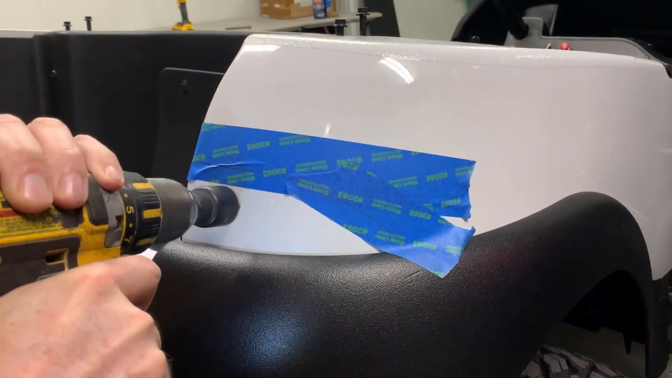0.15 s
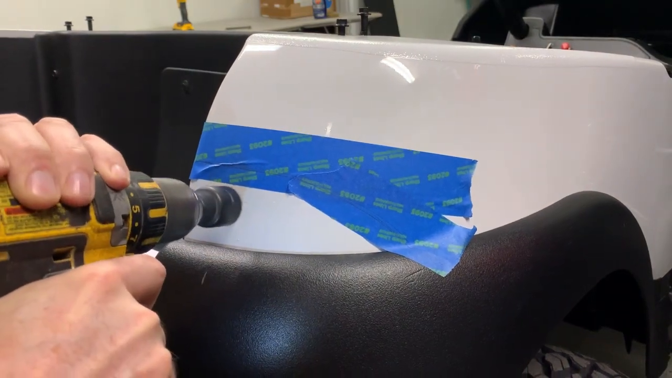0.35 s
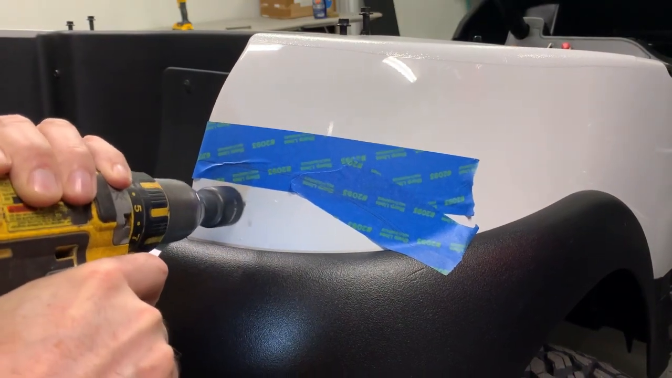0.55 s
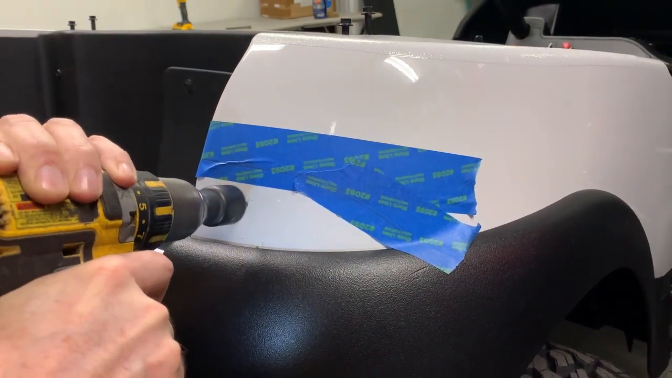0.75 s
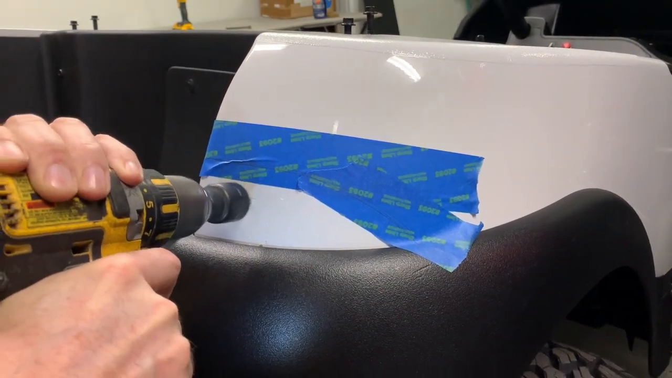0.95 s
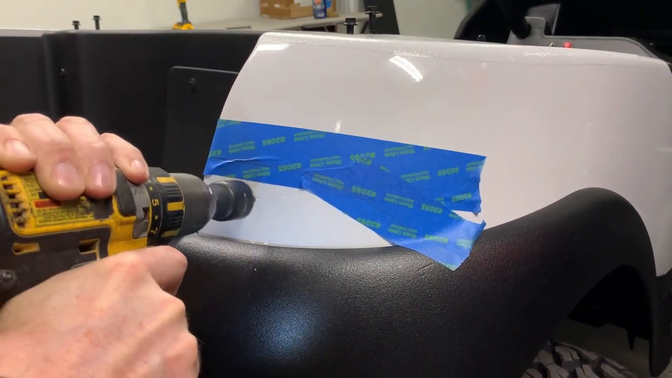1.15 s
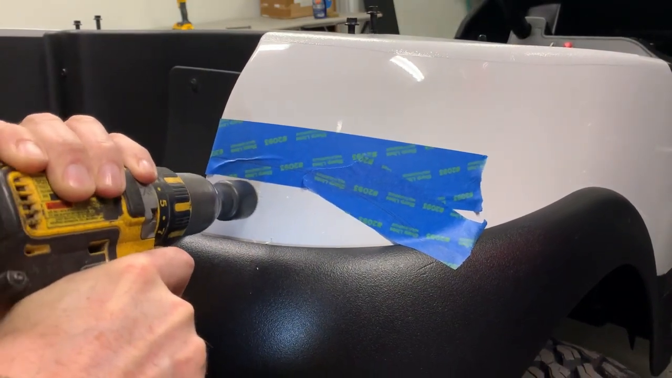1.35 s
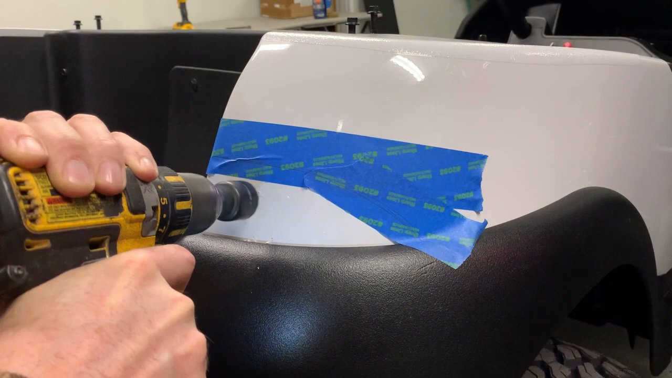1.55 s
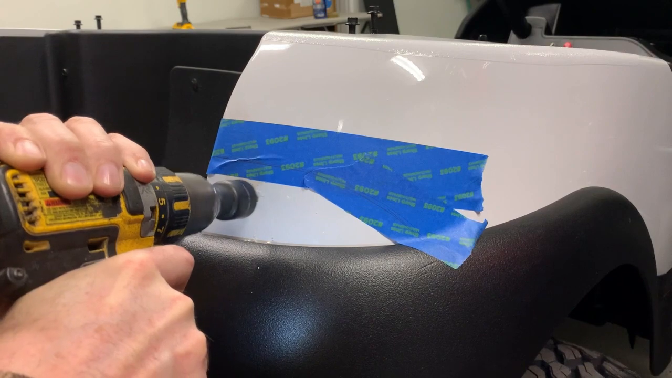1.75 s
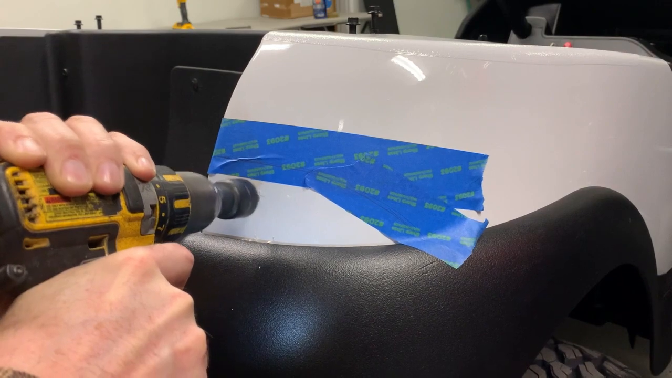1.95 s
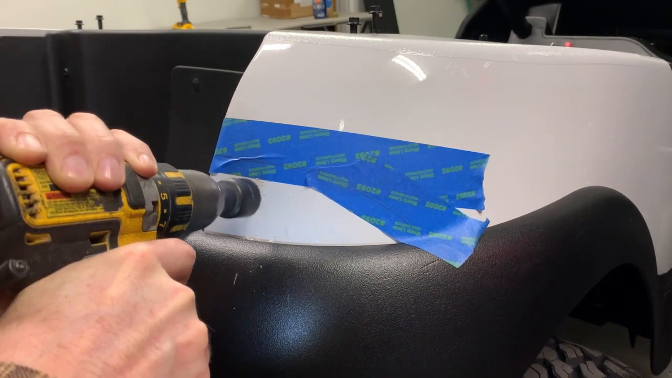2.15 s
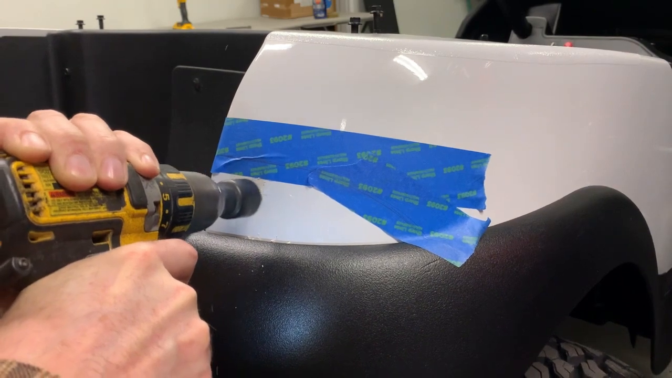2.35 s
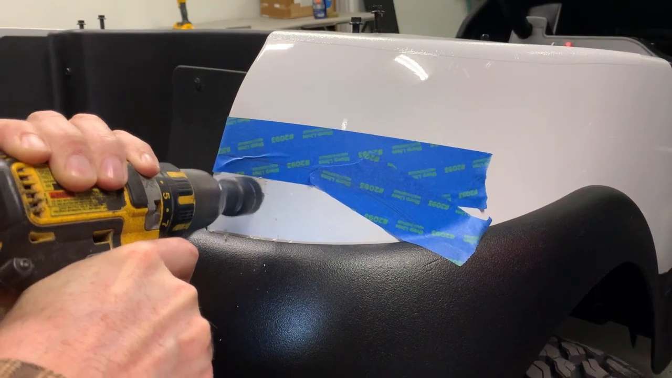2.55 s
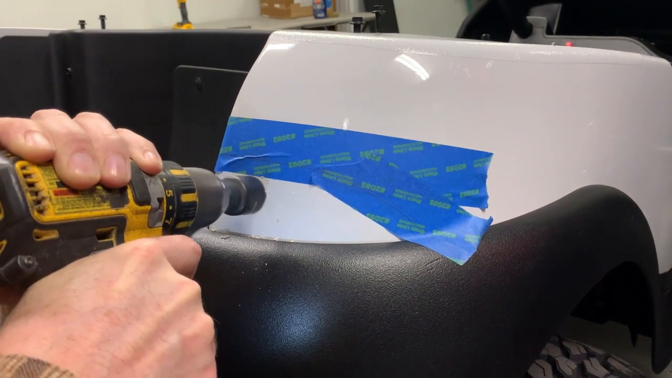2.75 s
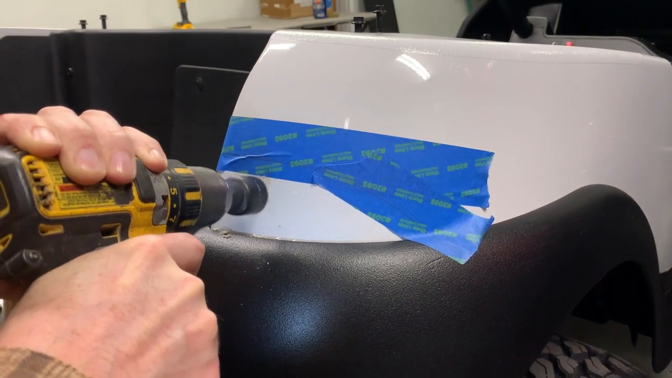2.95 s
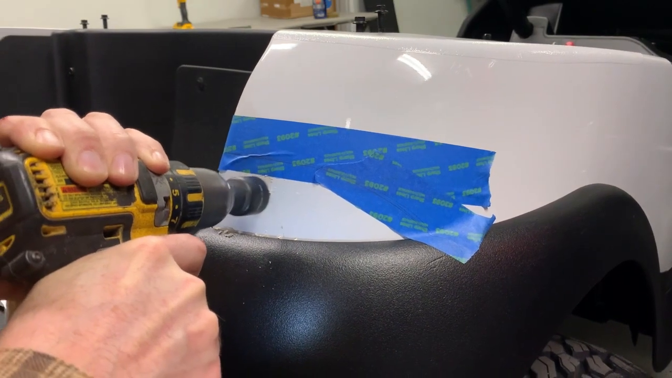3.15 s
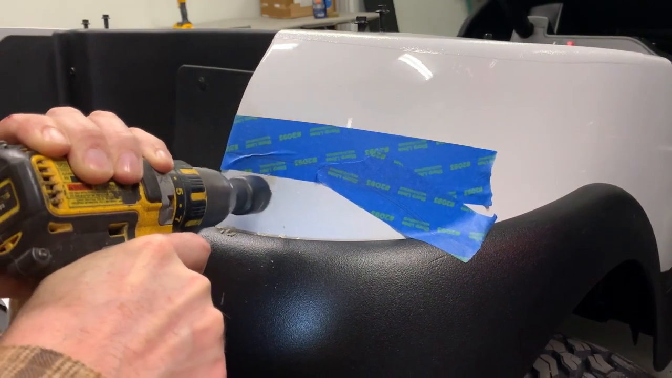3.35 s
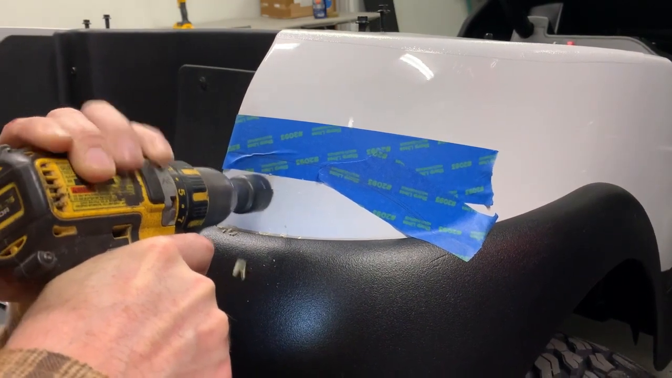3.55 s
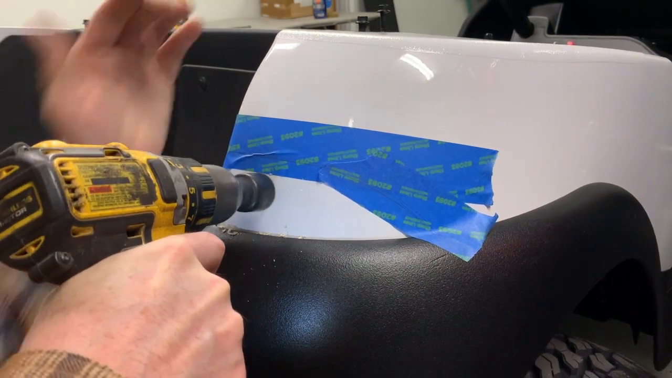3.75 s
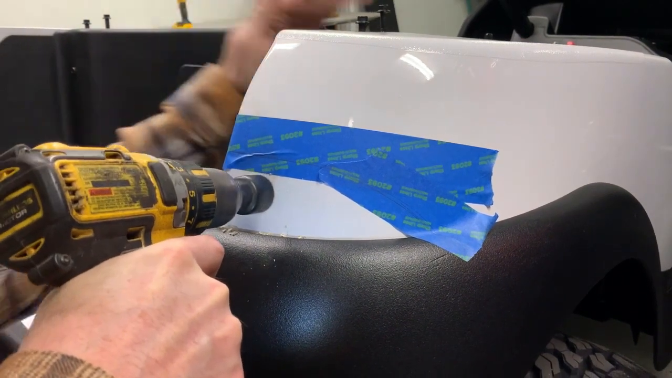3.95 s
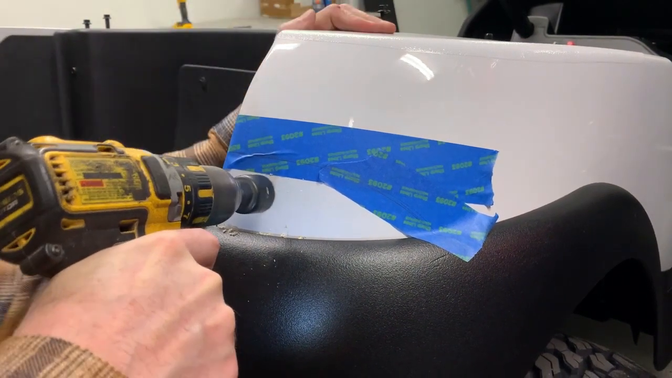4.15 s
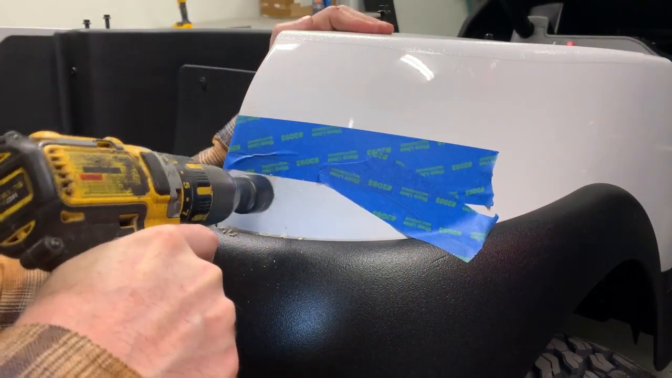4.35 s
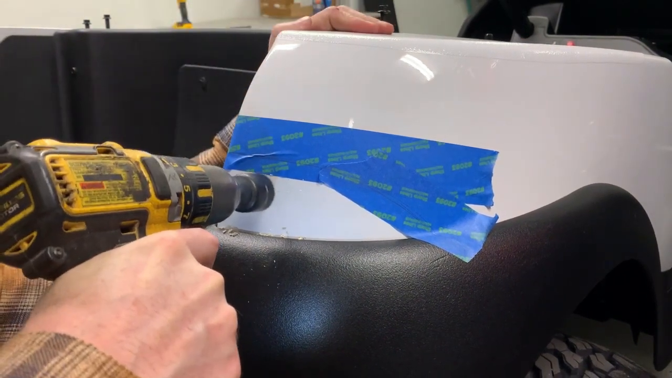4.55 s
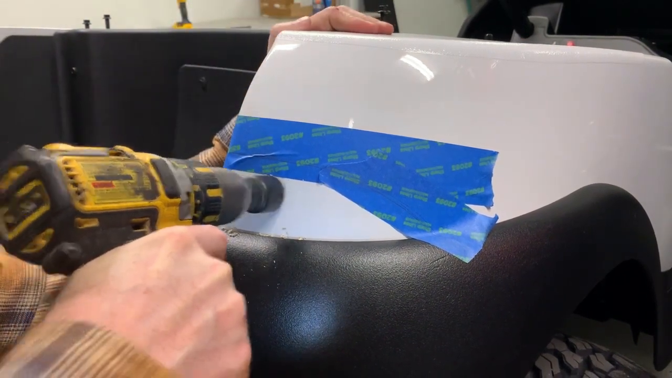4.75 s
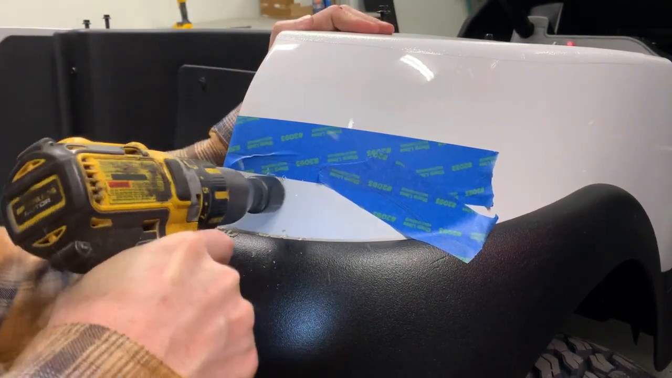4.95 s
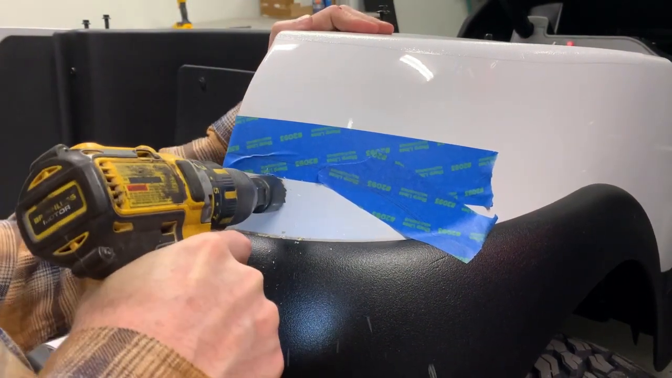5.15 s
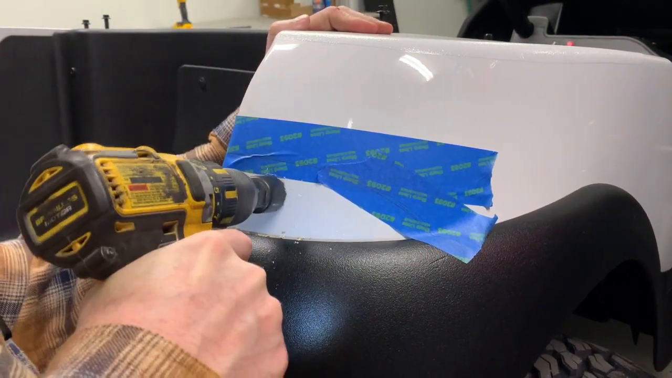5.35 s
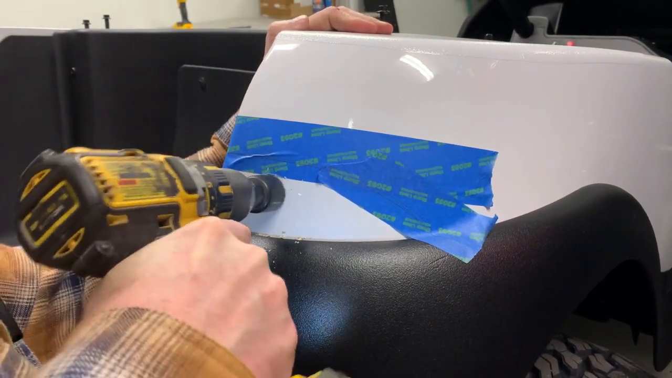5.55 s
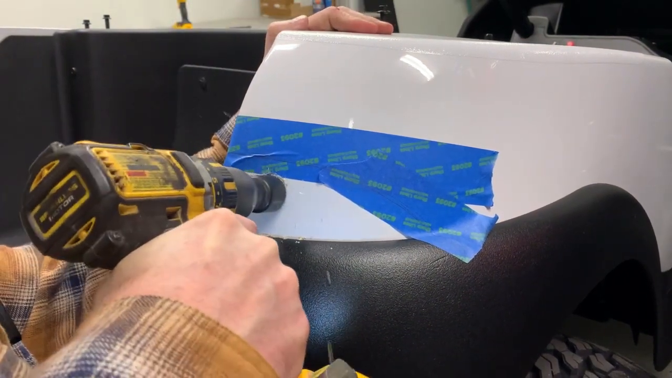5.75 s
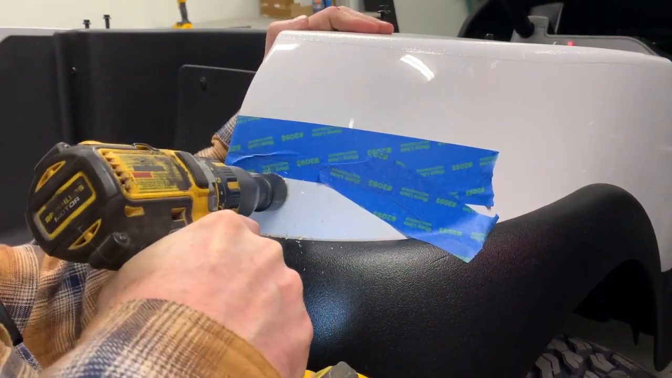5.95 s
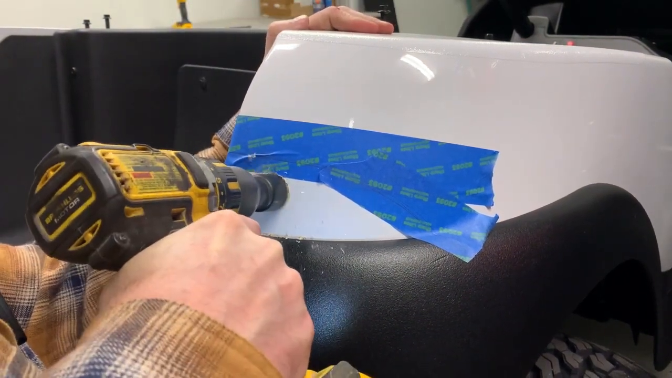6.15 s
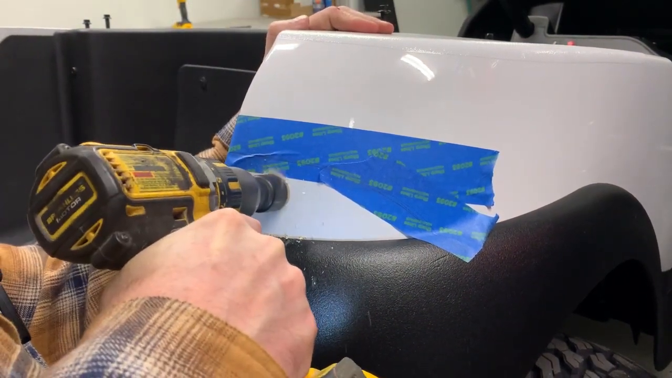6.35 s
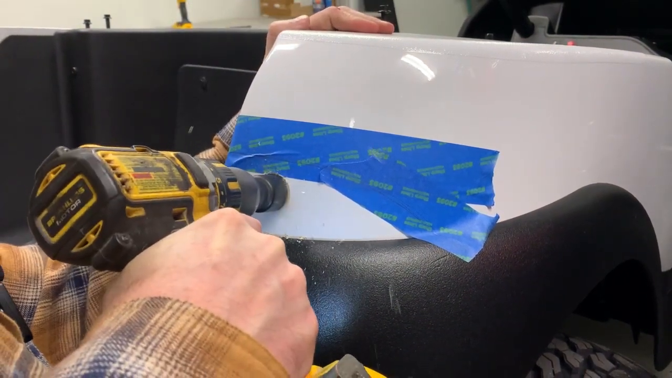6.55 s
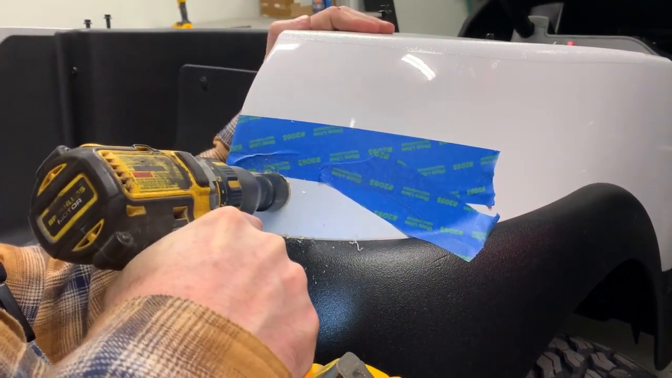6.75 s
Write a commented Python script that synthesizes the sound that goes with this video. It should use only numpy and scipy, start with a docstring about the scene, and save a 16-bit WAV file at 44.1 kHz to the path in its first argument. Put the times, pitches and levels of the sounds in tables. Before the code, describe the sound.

A cordless drill whines and scrapes through plastic, races with a squeal, coasts down, snags, stops, then bites into a loud, droning cut.

```python
"""Cordless drill and hole saw in a plastic panel

A drill close by cuts a plastic body panel in a garage: whining gear orders over rush, whirr and rattle noise.
The pilot bit scrapes through (filtered grains), the drill races, its shank squeals once a turn (swelling
noise in steel resonances) and it coasts down. The saw grazes the panel, snags and is braked; restarted,
its teeth bite, and grains drive the panel's modes into a drone. One motor angle times all the turning parts."""
import sys
import numpy as np
from scipy import signal
from scipy.fft import rfft, next_fast_len
from scipy.io import wavfile
from scipy.ndimage import uniform_filter1d

SR = 44100
rng = np.random.default_rng(int(sys.argv[2]) if len(sys.argv) > 2 else 0)


def to_wav(s):
    """Save 16-bit WAV."""
    ch = np.atleast_2d(s).T  # columns
    pcm = np.round(np.clip(ch, -1, 1) * 32767)  # PCM
    wavfile.write(sys.argv[1], SR, pcm.astype(np.int16))


N = 300321
TIME = np.arange(N) / SR

SAW_RATIO, CARRIER_RATIO = 49.5, 5.32  # motor turns per turn of the saw, of the planet carrier
# one snag drags the motor down and jolts the fender (slowing as a fraction of speed)
SNAG_S, SNAG_GRAB_S, SNAG_FREE_S, SNAG_SLOWING = 4.795, 0.032, 0.085, 0.41
BRAKE_S = 5.064

# level tables: before each source's trim
# pilot bit scraping, breaking through, widening the hole: time_s, level_db
PILOT_LEVEL = [(0.0, -46), (0.12, -38), (0.95, -37), (1.22, -42), (1.45, -56.5), (1.7, -61.5), (1.87, -42),
               (2.25, -49)]
# upper gear orders singing in the housing: time_s, level_db
WHIRR_LEVEL = [(0.08, -40), (0.2, -33), (0.68, -42), (1.1, -38), (1.7, -38.5), (1.88, -41.5), (1.96, -31),
               (2.1, -30), (2.25, -50)]
# wobble of the fast drill in the hole: time_s, level_db
WOBBLE_LEVEL = [(1.76, -68), (1.93, -44.5), (2.19, -41), (2.42, -48.5), (3.0, -49.5), (3.2, -55.5),
                (3.5, -65.5), (3.63, -56), (3.85, -74)]
# teeth cutting, one table a cut (grazing, biting): time_s, panel_drone_db, chip_noise_db
CUT_LEVELS = [
    [(4.27, -75, -76.5), (4.38, -72, -59.5), (4.44, -73, -49), (4.785, -64, -48.5), (4.806, -37, -44),
     (4.88, -39.5, -44.5), (4.95, -41, -50.5), (4.98, -37.5, -47), (5.07, -43, -64)],
    [(5.4, -47, -78), (5.44, -38, -81), (5.49, -38, -73), (5.56, -31.5, -51.5), (5.645, -29, -42),
     (5.68, -30.5, -34.5), (6.42, -28, -34), (6.52, -26.5, -33), (6.81, -31.5, -34)],
]
# chip noise spectrum: freq_hz, level_db
CHIP_SPECTRUM = [(150, -37), (600, 4.5), (1300, 1), (1900, -2), (2400, -28), (2950, -3.5), (3400, 1.5),
                 (4200, 4), (4700, -12), (6000, -0.5), (7000, -3.5), (7800, -14.5), (15000, -27.5)]
# panel resonances: freq_hz, width_hz, level_db
PANEL_MODES = [(94, 18, -23.5), (152, 28, -27), (215.6, 15.8, -1), (294.4, 48, -8), (347, 25.5, -1),
               (427, 46, -0.5), (448, 24, -1.5), (491.7, 13, 7), (550, 8.3, -4), (600, 68, -8.5),
               (692, 66, -6), (960, 150, -11.5), (1573, 340, -12), (2604, 195, -7)]
# lower resonances of the steel saw: freq_hz, width_hz, level_db
LOWER_MODES = [(2380, 77, -12), (3080, 306, -9), (3050, 58, 0.5), (3140, 180, -13.5)]
# upper resonances of the steel saw: freq_hz, width_hz, level_db
UPPER_MODES = [(5034, 230, 0.5), (5250, 480, -15), (5800, 500, -11), (8200, 450, -25), (10300, 300, -23)]


def amp(db):
    """Decibels to gain."""
    return 10 ** (np.asarray(db) / 20)


def evened(x):
    """Scales to rms 1."""
    return x / np.sqrt(np.mean(abs(x) ** 2) + 1e-20)


def together(*gains):
    """Unrelated causes add in power."""
    return np.sqrt(sum(gain ** 2 for gain in gains))


def driven(gain, db, steepness):
    """Follows a gain curve more or less steeply, up to db."""
    return amp(db) * (gain / gain.max()) ** steepness


def levels(rows):
    """Gain curves of a level table, fading to silence outside its span."""
    s, *columns = np.transpose(rows)
    s = np.r_[s[0] - .04, s, s[-1] + .12]
    return [amp(np.interp(TIME, s, np.r_[-110, c, -110], left=-300, right=-300)) for c in columns]


def read(points, hz):
    """A table's value on a log-frequency axis."""
    f, value = np.transpose(points)
    return np.interp(np.log(hz + 1), np.log(f + 1), value)


def body(x, modes=(), spectrum=None):
    """Minimum-phase filter: resonances summed in power with a broad spectrum."""
    hz = np.fft.rfftfreq(8192, 1 / SR)
    power = 1e-9 + sum(amp(db) ** 2 / (1 + ((hz - f) / width) ** 2 * 2) ** 2 for f, width, db in modes)
    if spectrum is not None:
        power = power + amp(read(spectrum, hz)) ** 2
    log_gain = np.log(np.r_[power, power[-2:0:-1]]) / 2
    # the Hilbert transform of log gain gives the causal phase
    taps = np.fft.ifft(np.exp(np.conj(signal.hilbert(log_gain)))).real[:4096]
    return signal.oaconvolve(x, taps)[:len(x)]


def unit_band(x, band_hz):
    """Scales so that one band has rms 1."""
    hz = np.fft.rfftfreq(N, 1 / SR)
    in_band = (hz > band_hz[0]) & (hz < band_hz[1])
    return x * N / np.sqrt(2 * np.sum(abs(rfft(x)[in_band]) ** 2))


def wander(hz):
    """Smooth chance of rms 1, up to about hz."""
    sos = signal.butter(2, min(hz, SR / 3), fs=SR, output="sos")
    return evened(signal.sosfilt(sos, rng.standard_normal(N)))


def grains(per_s, spread_db):
    """Tiny fractures of uneven size at random times, rms 1."""
    size = amp(spread_db * np.minimum(rng.exponential(1, N), 4))
    return evened(size * rng.standard_normal(N) * (rng.random(N) < per_s / SR))


def throb(angle, depth_db):
    """Gain that swells (dips if depth is negative) once a turn, rms 1."""
    return evened(amp(depth_db * (np.cos(angle) + np.cos(2 * angle) / 4)))


def jolt(start_s, rise_s, fall_s):
    """Rises to 1 and falls back."""
    return np.interp(TIME, [start_s, start_s + rise_s, start_s + rise_s + fall_s], [0, 1, 0])


def snag():
    """How hard the teeth are caught, 0-1."""
    return jolt(SNAG_S, SNAG_GRAB_S, SNAG_FREE_S)


def speed():
    """Motor turns per second, dragged down by the snag."""
    # motor speed before the snag's drag: time_s, speed_hz
    speed_points = [(0.0, 194), (0.16, 496), (0.2, 520), (0.7, 538), (0.95, 527), (1.15, 538), (1.7, 542),
                    (1.8, 714), (1.9, 940), (1.98, 1060), (2.13, 1120), (2.22, 925), (2.36, 812),
                    (3.63, 773), (3.8, 557), (3.9, 460), (4.03, 280), (4.2, 205), (4.29, 245), (4.36, 305),
                    (4.42, 586), (4.64, 575), (4.74, 552), (4.91, 648), (4.955, 650), (5.0, 553),
                    (5.06, 510), (5.115, 20), (5.37, 20.7), (5.41, 101), (5.51, 179), (5.55, 248),
                    (5.65, 241), (5.7, 540), (6.1, 556), (6.8, 533)]
    hz = np.interp(TIME, *np.transpose(speed_points))
    return np.maximum(hz * (1 - SNAG_SLOWING * snag()), 1)


def slewing(per_s=3.5):
    """How fast the speed changes, 0-1, against a relative change per second."""
    change = abs(np.gradient(np.log(speed()))) * SR
    return np.tanh(uniform_filter1d(change, size=900) / per_s)


def shaft(dip=0.049, settle_s=0.29, steady_swing=0.0029, flutter=0.00293):
    """Motor angle (rad); as the teeth bite, one side drags and the speed swings once a saw turn."""
    bite_s, swing_hz = 5.713, 10.8
    since = np.maximum(TIME - bite_s, 0)
    onset = np.clip((TIME - bite_s) * swing_hz * 4 + 1, 0, 1)
    swing = (dip * np.exp(-since / settle_s) + steady_swing) * onset
    hz = speed() * (1 + swing * np.cos(2 * np.pi * swing_hz * since) + flutter * wander(38.6))
    return 2 * np.pi * np.cumsum(hz) / SR


def by_speed(full_db, octave_db, full_hz=1100, stall_hz=130):
    """Gain of a noise that grows with every doubling of speed and dies as the motor stalls."""
    hz = speed()
    return amp(full_db + octave_db * np.log2(hz / full_hz)) / (1 + (stall_hz / hz) ** 2)


def stirred():
    """Gains of the rush, rumble and flutter that the cutting teeth stir up."""
    # at each cut's hardest, one row a cut: housing_rush_db, fender_rumble_db, fender_flutter_db
    peak_levels = [(-42, -40.5, -53), (-41.5, -59.5, -49.5)]
    # growth with the chip noise (exponent): rush, rumble, flutter
    growth = (1, 2.9, 1)
    chips = [levels(cut)[1] for cut in CUT_LEVELS]
    return [sum(driven(gain, db, steepness) for gain, db in zip(chips, column))
            for column, steepness in zip(np.transpose(peak_levels), growth)]


def background_air():
    """Steady filtered noise of rms 1."""
    # spectrum: freq_hz, level_db
    air_spectrum = [(25, -10.5), (70, -5.5), (250, 3.5), (700, -4), (2000, -13), (15000, -33)]
    return evened(body(rng.standard_normal(N), spectrum=air_spectrum))


def garage(x):
    """A diffuse tail, each band dying at its own rate."""
    # decay time to -60 dB: freq_hz, t60_s
    decay = [(100, 0.47), (500, 0.12), (3000, 0.14), (12000, 0.091)]
    hz, t, z = signal.stft(rng.standard_normal(SR), SR, nperseg=256)
    fall = np.exp(-np.log(1000) * t / read(decay, hz)[:, None])
    tail = signal.istft(z * fall, SR, nperseg=256)[1]
    tail[:300] = 0  # gap before the tail
    return signal.fftconvolve(x, tail / np.linalg.norm(tail))[:N]


def shake(pilot_db=(-62, -53), pilot_steepness=(0.45, 0.8), wobble_db=(-43, -36),
          wobble_steepness=(1.5, 1.35), snag_db=(-42, -37), settle_db=-52.5, settle_db_per_s=80):
    """Gains of fender rumble and flutter from pilot, wobble, snag and teeth; rumble settles after the brake."""
    pilot_gain, wobble_gain = levels(PILOT_LEVEL)[0], levels(WOBBLE_LEVEL)[0]
    rumble, flutter = [together(driven(pilot_gain, pilot_db[k], pilot_steepness[k]),
                                driven(wobble_gain, wobble_db[k], wobble_steepness[k]),
                                amp(snag_db[k]) * snag(),
                                by_teeth) for k, by_teeth in enumerate(stirred()[1:])]
    settle = (TIME > BRAKE_S) * amp(settle_db - settle_db_per_s * abs(TIME - BRAKE_S))
    return together(rumble, settle), flutter


def fender(saw, rumble_db=-1, flutter_db=-2, knock_share=0.19):
    """Bumps once a saw turn and uneven grains ring the fender's low modes and its fluttering edge."""
    # fender resonances: freq_hz, width_hz, level_db
    fender_modes = [(29.95, 18, -14.5), (70.9, 5.5, 9.5), (95.7, 13, -2)]
    # edge resonances: freq_hz, width_hz, level_db
    edge_modes = [(152.5, 14.7, 4), (221.5, 21, 6), (283.4, 54, 0)]
    turns = np.floor(saw / (2 * np.pi))
    knock = evened(np.diff(turns, prepend=0) * (TIME > .01))
    bumps = grains(per_s=2500, spread_db=4.5)
    rumble = unit_band(body(knock_share * knock + .7 * bumps, fender_modes), (40, 110))
    flutter = unit_band(body(.5 * knock + bumps, edge_modes), (120, 320))
    low, high = shake()
    return amp(rumble_db) * rumble * low + amp(flutter_db) * flutter * high


def knocks():
    """Louder turns of the squeal, knocks, snag, brake and trigger: a short crack rings saw and panel."""
    # part levels are peaks relative to level_db: time_s, level_db, steel_ring_db, crack_db, panel_thud_db
    hits = [(2.659, -36, -7, -36, -24.5), (2.781, -46, -10, -10, -21.5), (2.841, -27, 4.5, -29, -31),
            (3.537, -36, -13, -7, -19), (3.599, -36, -15, -8, -4.5), (4.797, -27.5, -8, 5, -5.5),
            (4.826, -29, -13.5, 2.5, -13), (5.067, -26.5, -28.5, -8.5, 3), (5.372, -60, -16, -12, 4)]
    out, t = np.zeros(N), np.arange(6000) / SR
    for s, db, *parts_db in hits:
        crack = rng.standard_normal(len(t)) * np.exp(-t / .0035)
        parts = body(crack, LOWER_MODES), body(crack, UPPER_MODES, CHIP_SPECTRUM), body(crack, PANEL_MODES)
        hit = sum(amp(part_db) * part / abs(part).max() for part_db, part in zip(parts_db, parts))
        place = out[round(s * SR):][:len(t)]
        place += amp(db) * hit[:len(place)]
    return out


def pilot(saw, carrier, scrape_db=-2.0):
    """The pilot bit shaves plastic, harder on one side of each turn."""
    # bit resonances: freq_hz, width_hz, level_db
    bit_modes = [(138, 23, -1.5), (353, 10, 8), (472, 35, 4.5), (500, 25, 2), (3270, 420, 3.5),
                 (4290, 320, 3.5), (5420, 160, 3), (6555, 550, 5)]
    # scrape spectrum: freq_hz, level_db
    scrape_spectrum = [(60, -10), (170, -10.5), (450, -1.5), (700, 0), (1450, 2.5), (1750, -4),
                       (2250, -7.5), (2550, 2), (3500, -1.5), (3950, -8), (5900, -7), (7000, -19),
                       (7700, -32), (15000, -30)]
    shavings = grains(per_s=11000, spread_db=3.0) * throb(saw, depth_db=1.1) * throb(carrier, depth_db=-1.5)
    scrape = unit_band(body(shavings, bit_modes, scrape_spectrum), (2500, 3900))
    return amp(scrape_db) * scrape * levels(PILOT_LEVEL)[0]


def squeal(saw, carrier, lower_db=-1, upper_db=-1):
    """The shank rubs the hole hardest once a turn, catching unevenly, and rings the steel saw."""
    # rubbing level before trim: time_s, lower_ring_db, upper_ring_db
    rub_levels = [(1.15, -82, -44), (1.55, -69, -49.5), (2.0, -54, -53), (2.2, -46, -57),
                  (2.36, -38.5, -43), (2.85, -39, -40.5), (3.35, -42, -45.5), (3.6, -62, -43),
                  (3.64, -60, -50)]
    # the upper ring sags as the pressure eases: time_s, shift_hz
    sag_points = [(2.3, 175.5), (2.8, 30.5), (3.3, -25), (3.52, -110), (3.62, -370)]
    slips = grains(per_s=9000, spread_db=3.5) * throb(carrier, depth_db=-2.0)
    lower = body(slips * throb(saw, depth_db=3.7) * amp(1.3 * wander(8)), LOWER_MODES)
    upper = body(slips * throb(saw, depth_db=1.7) * amp(1.3 * wander(60)), UPPER_MODES)
    sag_rad = 2 * np.pi * np.cumsum(np.interp(TIME, *np.transpose(sag_points))) / SR
    analytic = signal.hilbert(upper, next_fast_len(N))[:N]
    upper = (analytic * np.exp(1j * sag_rad)).real
    lower, upper = unit_band(lower, (2800, 3500)), unit_band(upper, (4200, 5800))
    lower_gain, upper_gain = levels(rub_levels)
    return amp(lower_db) * lower * lower_gain + amp(upper_db) * upper * upper_gain


def clatter(angle, bands):
    """Loose teeth smear each order into a band of noise that follows the motor."""
    return sum(amp(db) * (wander(width / 2) * np.cos(order * angle) + wander(width / 2) * np.sin(order * angle))
               for order, width, db in bands)


def teeth(angle, saw, drone_db=-4.5, chips_db=(-5, -1)):
    """Teeth tear off chips; each tug drives the panel's modes and jolts the gears."""
    # saw cup resonances: freq_hz, width_hz, level_db
    cup_modes = [(2080, 410, 7.5), (3880, 970, 3.5), (6020, 380, -2.5), (8300, 710, -13.5)]
    # drill shell spectrum: freq_hz, level_db
    shell_spectrum = [(100, 1.5), (4800, 1.5), (5500, -14.5), (6300, 3), (7000, -4), (7600, -11.5)]
    # gear orders smeared by the tugs, one table a cut: order, width_hz, level_db
    loaded_bands = [
        [(1, 64, -3), (2, 130, -7), (3, 170, -5), (4, 160, 2), (6.05, 780, -5), (8, 380, -0.5), (12, 490, 5)],
        [(1, 110, -5), (1.9, 174, -5), (3.85, 34, -17), (4, 97, -13.5), (8, 200, -12), (11.75, 130, -5.5)],
    ]
    pressure = throb(saw, depth_db=1.0)
    drone = body(grains(per_s=6000, spread_db=0.0) * pressure, PANEL_MODES)
    chips = body(grains(per_s=12000, spread_db=-1.5) * pressure, cup_modes, CHIP_SPECTRUM)
    drone, chips = unit_band(drone, (200, 480)), unit_band(chips, (3000, 4400))
    out = np.zeros(N)
    for cut, bands, db in zip(CUT_LEVELS, loaded_bands, chips_db):
        drone_gain, chip_gain = levels(cut)
        gears = body(clatter(angle, bands), spectrum=shell_spectrum) * pressure
        out += amp(drone_db) * drone * drone_gain + (amp(db) * chips + gears) * chip_gain
    return out


def rush_gain(pilot_db=-49.0, pilot_steepness=0.34, whirr_db=-23, wobble_db=-6.5, brake_db=-41.5):
    """The housing's rush grows with speed and every load on the drill, and flares as the brake clacks."""
    return together(by_speed(full_db=-56.5, octave_db=11.5),
                    driven(levels(PILOT_LEVEL)[0], pilot_db, pilot_steepness),
                    amp(whirr_db) * levels(WHIRR_LEVEL)[0],
                    amp(wobble_db) * levels(WOBBLE_LEVEL)[0],
                    stirred()[0],
                    amp(brake_db) * jolt(BRAKE_S, rise_s=0.003, fall_s=0.0082))


def motor(angle, saw, carrier, rush_db=-1, whirr_db=-5.0, rattle_db=-3.0):
    """Air rush in the housing, upper orders ringing the gear case, slack-gear rattle and gearbox rustle."""
    # rush spectrum: freq_hz, level_db
    motor_spectrum = [(100, -4.5), (250, -4), (700, -11.5), (1300, -10), (2000, 7), (3600, 8), (4000, -8.5),
                      (7000, 6.5), (7800, -3.5), (9500, 2), (12200, 2.5), (15800, -1)]
    # resonances of housing, then of gear case: freq_hz, width_hz, level_db
    housing_modes = [(3554, 150, 8), (5250, 810, 12), (6590, 490, 12.5), (8850, 1300, 5.5),
                     (10570, 450, 4.5), (14000, 1640, 4.5)]
    gearcase_modes = [(4340, 630, -3.5), (5280, 280, 2), (6680, 680, 3), (8480, 450, -9.5)]
    # rustle spectrum: freq_hz, level_db
    gearbox_spectrum = [(100, -19), (230, 2), (450, -8.5), (800, -4.5), (1400, -2), (1750, -5.5),
                        (2100, -24.5), (2700, -11), (4100, -9), (6500, -9), (7800, -45.5), (15000, -31)]
    # noise bands following the motor, whirr then rattle: order, width_hz, level_db
    whirr_bands = [(8, 140, 0), (7.8, 720, -2.5), (8.2, 920, 0), (8.8, 900, -1.5), (19, 310, -3.5),
                   (4.1, 1400, 0), (4.5, 390, -6)]
    rattle_bands = [(1, 147, 3), (1.25, 38, -4), (1.8, 180, -6), (2, 400, -3), (3, 220, -1.5),
                    (4, 740, 0.5), (6, 470, -12), (8, 700, -11), (12, 740, -29)]
    rush = unit_band(body(grains(per_s=24000, spread_db=1.2), housing_modes, motor_spectrum), (9500, 15000))
    whirr = unit_band(body(clatter(angle, whirr_bands), gearcase_modes), (3000, 9500))
    rustle = unit_band(body(grains(per_s=3000, spread_db=1.5), spectrum=gearbox_spectrum), (1100, 1800))
    rattle = clatter(angle, rattle_bands) * levels(WOBBLE_LEVEL)[0] * throb(saw, depth_db=1.3)
    sound = amp(rush_db) * rush * rush_gain() + amp(whirr_db) * whirr * levels(WHIRR_LEVEL)[0]
    sound = sound + amp(rattle_db) * rattle + rustle * by_speed(full_db=-60.0, octave_db=3.5)
    return sound * throb(carrier, depth_db=0.8) * throb(saw, depth_db=0.46)


def whine(angle, saw, carrier, rough=0.19, sideband=0.082, level_db=-0.64, fade_s=0.06,
          slew_db=-5.5, slew_blur_rad=0.9):
    """Motor orders 1-4, loaded differently by each job; gears unload, weaken and blur as speed changes."""
    # one row a job, before radiation, trim and slewing: start_s, end_s, order1_db, order2_db, order3_db,
    # order4_db, change_over_job_db, phase_jitter_rad, swell_per_saw_turn_db
    jobs = [(0.0, 0.09, -43, -54, -43.5, -41, 0.5, 0.46, -2),
            (0.11, 1.301, -39.5, -63, -39.5, -48.5, 0, 0.3, -4.5),
            (1.32, 1.71, -39.5, -78, -43, -51, -5.5, 0.37, -0.5),
            (1.708, 1.853, -44.5, -58, -50, -41, -5, 1.06, -0.5),
            (1.857, 2.27, -65, -39.5, -64, -45, -3, 0.4, 2.5),
            (2.285, 3.51, -54.5, -72, -60.5, -40, -10, 0.24, 2),
            (3.69, 3.857, -47.5, -62, -74, -61, -8.5, 0.096, -4),
            (4.248, 4.299, -62.5, -75, -64, -45, 3, 0.4, -2),
            (4.311, 4.386, -40.5, -63, -47.5, -49, -3.5, 0.32, 0.5),
            (4.4, 4.8, -53, -59, -54.5, -41, -2, 0.47, 1), (4.815, 4.86, -19, -49, -59, -22.5, -2, 0.6, -1),
            (4.9, 4.971, -35, -63.5, -50, -32, -1.5, 0.1, 2.5),
            (5.511, 5.681, -34, -47.5, -41.5, -33, 1.5, 0.37, -0.5),
            (5.664, 6.809, -34, -46, -51, -32.5, -0.5, 0.63, -1.5)]
    # how well the drill's body radiates an order: freq_hz, level_db
    radiation = [(100, -17.5), (250, -2.5), (530, -0.5), (780, 1.5), (1000, 2.5), (1250, 3.5), (1600, -1),
                 (2200, 0), (2600, 5), (3200, 1), (4400, -0.5)]
    hz, slew, tones = speed(), slewing(), np.zeros(N)
    orders = []
    for k in np.arange(4) + 1:
        radiated = amp(read(radiation, k * hz)) * (1 + rough * wander(35))
        orders.append((k, radiated, wander(47)))
    for start, end, *orders_db, change_db, jitter, swell_db in jobs:
        gate = np.clip(np.minimum(TIME - start, end - TIME) / fade_s + .5, 0, 1)
        on = gate > 0
        drift = amp(change_db * (TIME[on] - start) / (end - start))
        gain = (gate * throb(saw, depth_db=swell_db))[on] * drift
        blur = jitter + slew_blur_rad * slew[on]
        for (k, radiated, slop), db in zip(orders, orders_db):
            tones[on] += amp(db) * gain * radiated[on] * np.cos(k * angle[on] + blur * slop[on])
    # the planet carrier modulates the level once a turn
    return amp(level_db + slew_db * slew) * np.sqrt(2) * tones * (1 + sideband * np.cos(carrier))


def scene(room_db=-18, air_db=-82):
    """All turning parts share the one motor angle; both channels are the same."""
    angle = shaft()
    hardest_rub_s = 2.845  # saw angle 0
    saw = (angle - np.interp(hardest_rub_s, TIME, angle)) / SAW_RATIO
    carrier = angle / CARRIER_RATIO
    drill = whine(angle, saw, carrier) + motor(angle, saw, carrier)
    work = pilot(saw, carrier) + fender(saw) + squeal(saw, carrier) + teeth(angle, saw) + knocks()
    dry = drill + work
    return np.tile(dry + amp(room_db) * garage(dry) + amp(air_db) * background_air(), (2, 1))


def record(dry, edge_hz=15800):
    """Linear-phase low-pass that limits the bandwidth."""
    taps = signal.firwin(511, edge_hz, window=("kaiser", 9), fs=SR)
    return signal.oaconvolve(dry, taps[None], "same")


dry = scene()
out = record(dry)
to_wav(out)
```